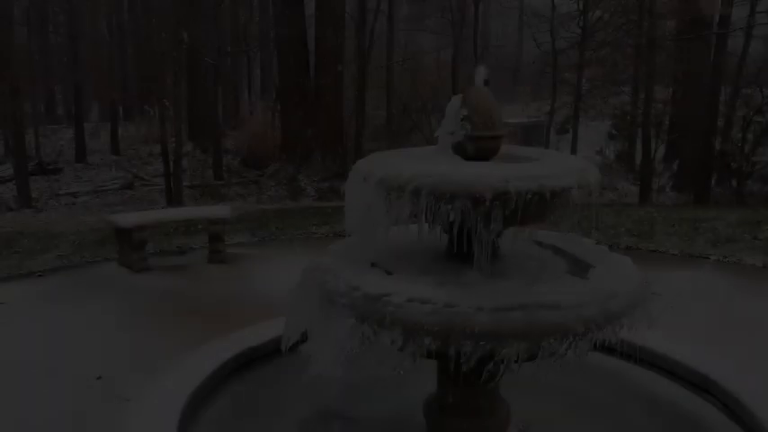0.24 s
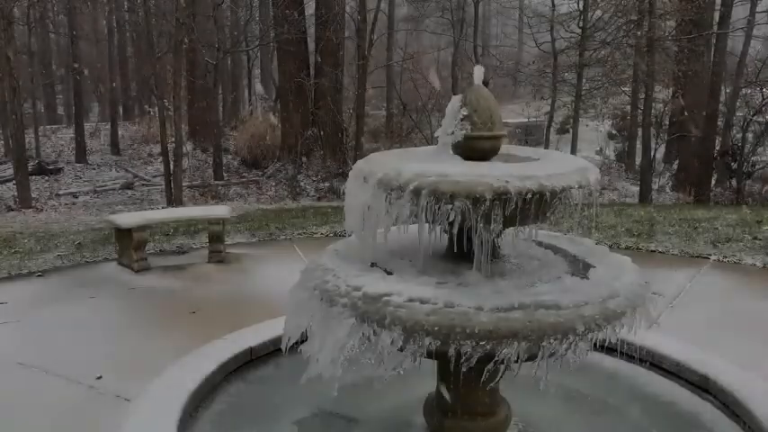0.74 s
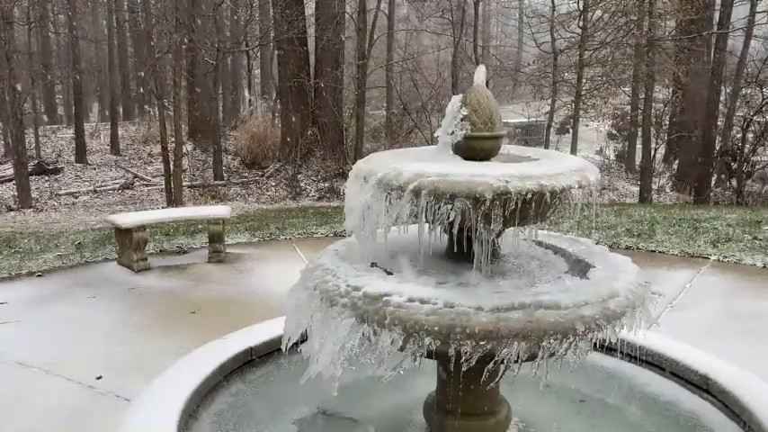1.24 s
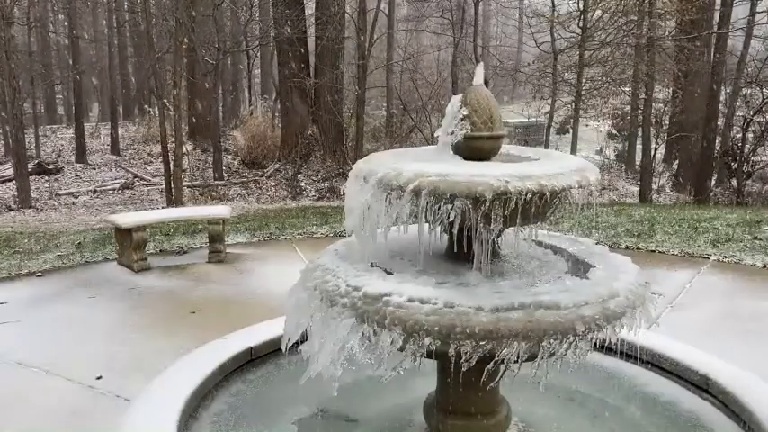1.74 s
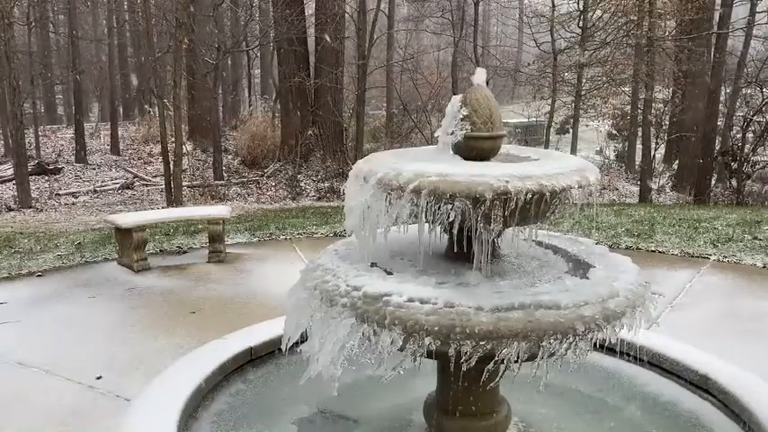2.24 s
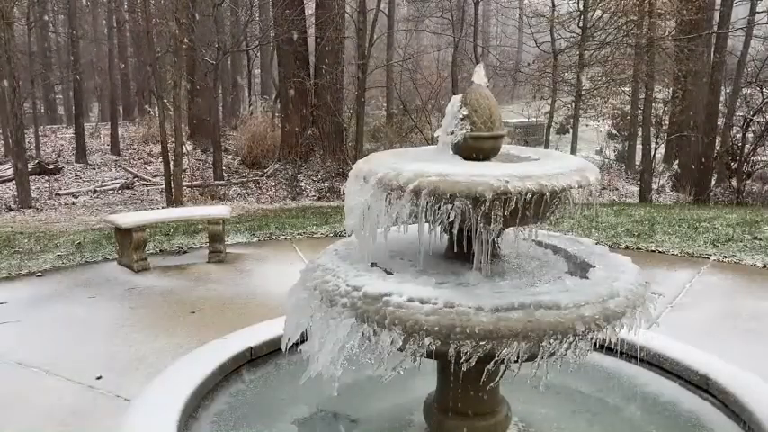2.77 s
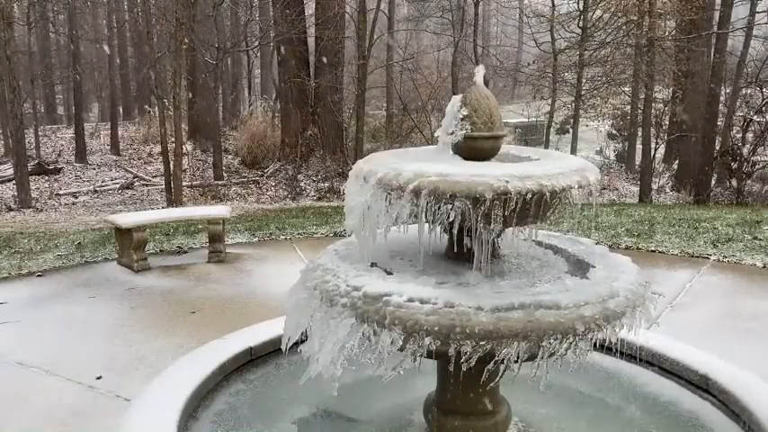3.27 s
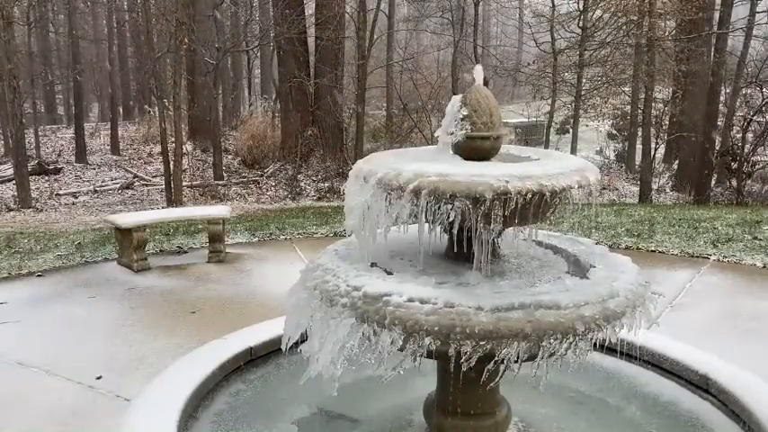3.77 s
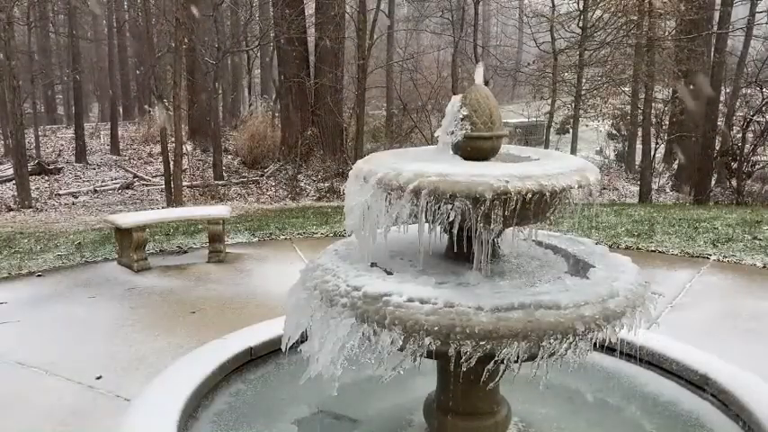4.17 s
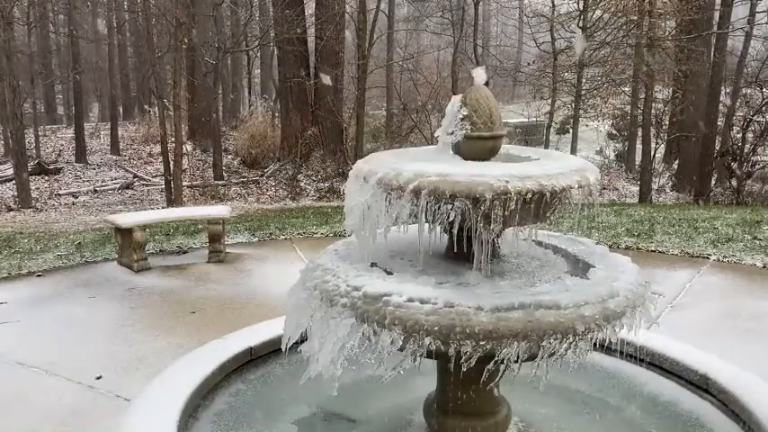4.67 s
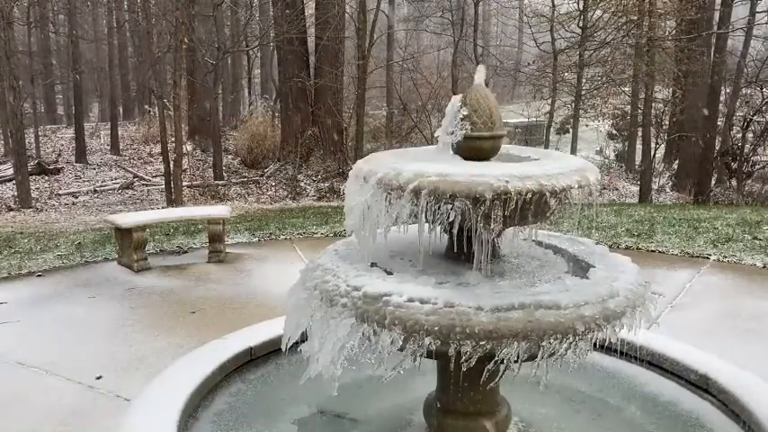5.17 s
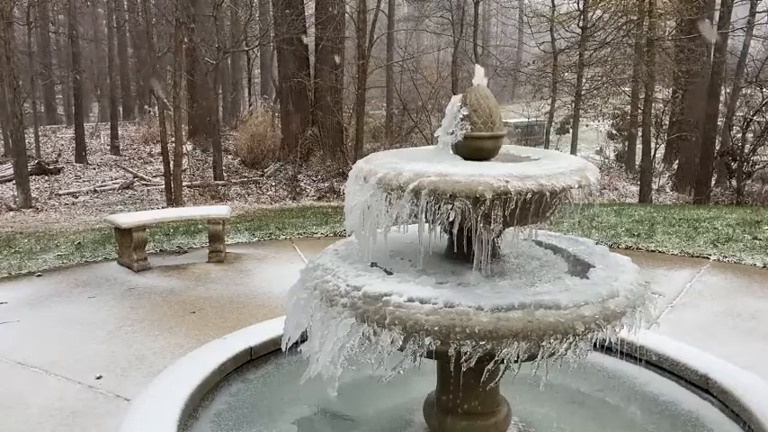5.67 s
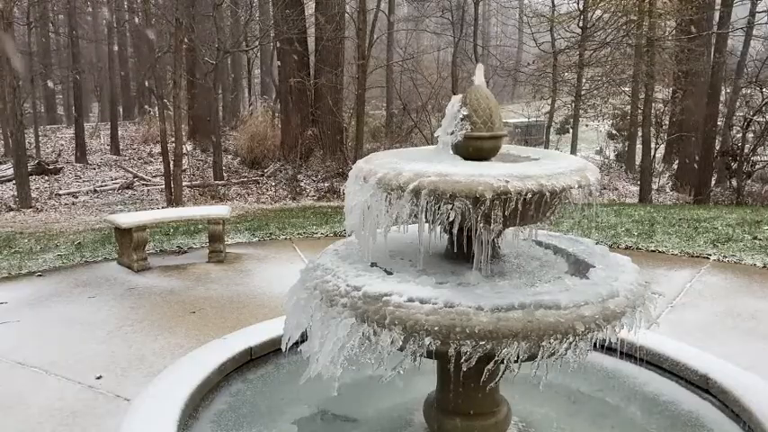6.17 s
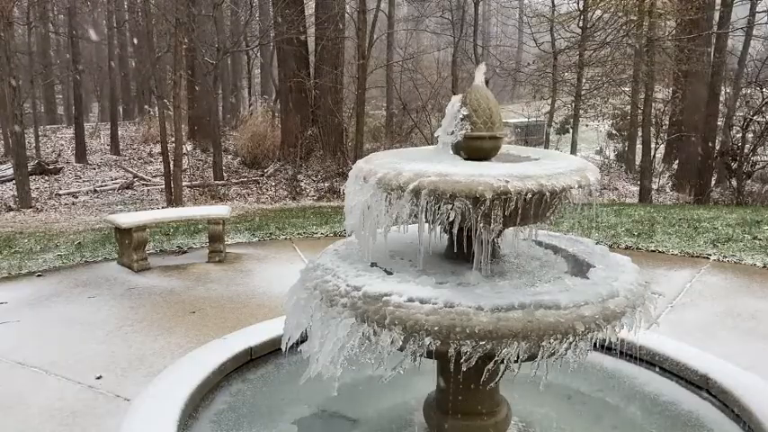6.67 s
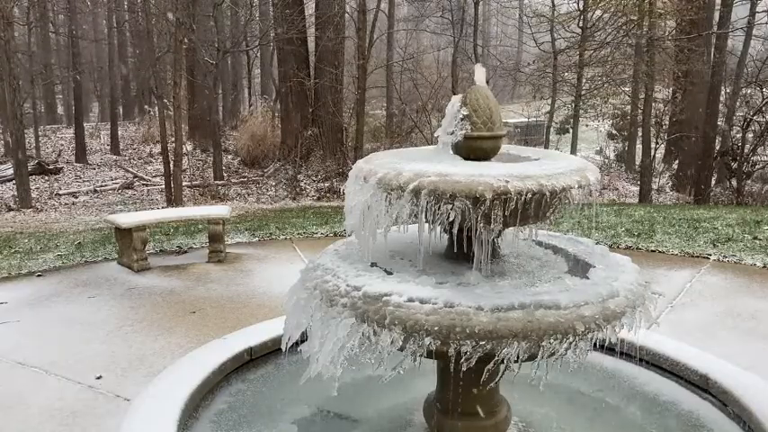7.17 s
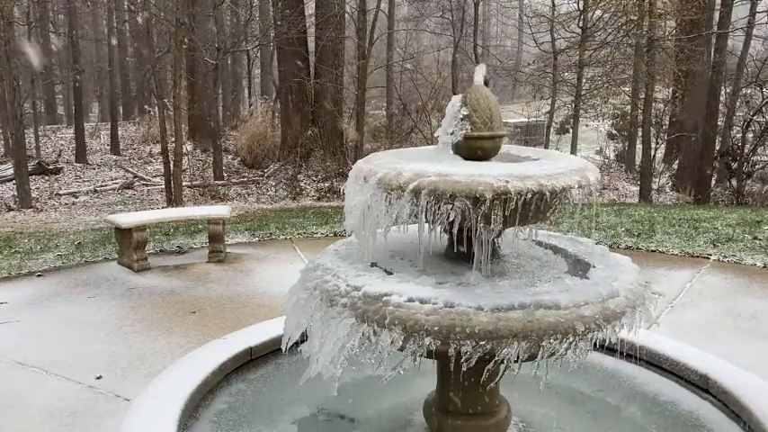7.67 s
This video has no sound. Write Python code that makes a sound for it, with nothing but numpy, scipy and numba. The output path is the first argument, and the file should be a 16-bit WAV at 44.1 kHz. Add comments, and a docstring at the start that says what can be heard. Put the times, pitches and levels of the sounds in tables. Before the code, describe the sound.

From silence, the sound fades in evenly over the first second. Thin streams of water fall from an icy tiered fountain a few steps away, slightly right of centre, and keep an almost constant level to the end near 8 s. Crisp, fine spray hiss lies over a soft mid-range gurgle. Irregular bubbles plip throughout, mostly rising in pitch, with short clumped gulps near 1.6, 2.6, 3.4 and 5.6 s. Tiny glassy pings and hard drops tick on ice, notably around 2, 4.2 and 5.1 s. The brightest, loudest plop comes at 5.4 s, a sharp slap at 6.5 s and a short plunk at 7 s. Stone bowls add a very brief dull scatter. Far traffic rumbles low beneath; a distant engine drones on a slowly climbing low note, strongest near 6.2 s, then faint rasp and soft tyre noise follow.

```python
"""Icy garden fountain with far traffic

Thin streams fall from the icy rim of a tiered fountain, a few steps from a phone and a little to its right.
Noise and short damped tones make the spray, fizz, small high bubbles and larger, mostly rising bubbles. The
stone bowls echo them as a brief, dull scatter of noise. Far traffic is low filtered noise; one engine, a slowly
climbing tone, drones for a while. The sound fades in over the first second."""
import sys
import numpy as np
from scipy import signal
from scipy.fft import rfft, irfft, next_fast_len
from scipy.io import wavfile
from numba import njit

SR = 44100
rng = np.random.default_rng(int(sys.argv[2]) if len(sys.argv) > 2 else 0)


def unload_wav(signal):
    """Save mono or channel-first audio to the path in sys.argv[1] as 16-bit WAV at rate SR, clipped to [-1, 1]."""
    wavfile.write(
        sys.argv[1],
        SR,
        np.round(np.clip(np.atleast_2d(signal).T, -1, 1) * 32767).astype(np.int16),
    )


N = 348732
TIME = np.arange(N) / SR  # s

# The fall of water. Each row: time in seconds, gurgle level in dB.
GURGLE_LEVEL = [(1, -46.5), (2.2, -47), (3.1, -46.5), (3.8, -48), (4.8, -47.5), (5.7, -46.5), (6.2, -47),
                (7.9, -47)]
# Filter for the gurgle in the basins. Each row: frequency in Hz, gain in dB.
GURGLE_SPECTRUM = [(150, -22), (300, -8), (500, -2.5), (900, -.7), (1500, 0), (2000, -2.3), (2600, -7),
                   (3500, -12), (4500, -14.5), (5300, -38), (9000, -48)]
# Filter for the sharp spray. Each row: frequency in Hz, gain in dB.
SPRAY_SPECTRUM = [(400, -14), (1500, -5), (2800, -2), (4200, -1), (7000, -1), (8500, .7), (10500, -.8),
                  (13000, -3.2), (15800, -5)]
# Filter for mist heard from all round. Each row: frequency in Hz, gain in dB.
MIST_AROUND_SPECTRUM = [(400, 34), (3000, 35.5), (4500, 26.5), (5600, -26), (15000, -6)]
# The far road. Each row: time in seconds, rumble level in dB.
ROAD_LEVEL = [(1, -45.5), (3.6, -44), (4.6, -45), (5.65, -44), (6.8, -45), (7.9, -44.5)]
# Filter for the road rumble. Each row: frequency in Hz, gain in dB.
ROAD_SPECTRUM = [(22, -19), (40, -15), (54, 2), (70, 4.5), (86, 0.5), (162, -8), (250, -12.5), (400, -19),
                 (1500, -20), (4000, -88)]
# Filter for light air at the microphones. Each row: frequency in Hz, gain in dB.
AIR_SPECTRUM = [(25, -16), (55, 0.5), (85, 2.0), (140, -31.0), (400, -14.5), (2000, -104)]
# The loudest single bubbles. Each row: start in seconds, peak level in dB, starting pitch in Hz,
# ring length in cycles of that pitch, pitch rise per ring length as a share (it levels off at 3/4).
LOUD_BUBBLES = [(0.121, -34, 1500, 9.8, .25), (0.248, -34, 2000, 17, 1.3), (0.42, -32, 4070, 17, 0.76),
                (0.713, -30, 2720, 5.9, .25), (0.87, -42, 660, 15, .4), (0.924, -35, 1430, 10, 0.21),
                (0.998, -43, 750, 10, 0.18), (1.226, -41.5, 840, 22, 0.62), (1.27, -40, 2000, 33, .15),
                (1.333, -42, 740, 16, .4), (1.607, -34, 780, 6.8, 0.28), (1.608, -31, 2880, 12, 0.32),
                (1.66, -38, 1250, 33, 0.4), (1.738, -39, 2020, 15, 0.79), (1.82, -43, 563, 13, 0.18),
                (1.9, -41, 520, 10, .3), (1.949, -37, 1180, 14, 0.46), (2.019, -40, 1900, 29, 0.44),
                (2.125, -41.5, 832, 50.5, .6), (2.269, -39, 980, 28, 0.43), (2.316, -32.5, 2020, 9.1, .25),
                (2.569, -33.5, 2570, 15, .25), (2.74, -38.5, 1220, 20, .15), (2.77, -36, 1490, 15, 1.1),
                (2.902, -35.5, 895, 15, 0.49), (2.907, -36, 1742, 33, .05), (2.998, -40, 547, 14, 0.27),
                (3.065, -31.5, 970, 6.4, 0.94), (3.126, -34.5, 1110, 15, 0.28),
                (3.139, -38, 1429, 15, 0.97), (3.215, -40.5, 1390, 29, .2), (3.402, -40.5, 524, 8.8, .2),
                (3.408, -37, 1363, 30, .05), (3.676, -40, 3100, 9, .05), (3.712, -35.5, 1850, 15, .05),
                (3.711, -35, 895, 9.4, 0.18), (4.33, -45, 573, 48, 0.27), (4.336, -38, 1190, 26, 0.27),
                (4.49, -38.5, 418, 15, 1.3), (4.526, -41, 456, 8.1, 0.18), (4.722, -39.5, 416, 13, 1.25),
                (4.85, -41, 676, 27, 0.85), (4.874, -31.5, 3580, 8.1, 0.18), (5.004, -43, 458, 29, 1),
                (5.051, -42, 611, 47, 1.5), (5.129, -39, 3950, 15, 0.56), (5.206, -35, 1205, 26, 0.64),
                (5.327, -40.5, 871, 38, .05), (5.4278, -22.5, 2390, 6.4, 0.35),
                (5.429, -22, 2890, 16, 0.97), (5.4305, -22, 4150, 24, 0.024),
                (5.434, -30.5, 3300, 23, 0.27), (5.646, -40, 480, 11, 0.24), (5.702, -37, 1450, 42, 0.064),
                (5.778, -35.5, 1061, 16, .25), (5.868, -39.5, 990, 27, 0.57), (6.428, -47, 1020, 21, 0.44),
                (6.483, -36, 1025, 12, .4), (6.538, -39, 483, 17.4, 2.04), (6.621, -28.5, 1577, 13.5, 0.05),
                (6.775, -41, 480, 6.3, 0.17), (6.822, -39, 990, 12, 0.44), (6.966, -37.5, 1220, 16, 1.9),
                (7.007, -26, 1120, 3.1, 0.05), (7.12, -40, 990, 22, .6), (7.251, -39.5, 457, 8.2, 0.17),
                (7.269, -43, 880, 29, 0.56), (7.365, -37, 1770, 18, .05), (7.521, -41, 2070, 47, .05),
                (7.617, -41, 1300, 22, .3), (7.797, -39, 890, 17, .2)]
# Further high bubbles, with a common ring length and rise. Each row: start in seconds, peak level in dB,
# starting pitch in Hz.
LOUD_HIGH_BUBBLES = [(0.987, -40, 6400), (1.3975, -33, 5730), (1.96, -28.5, 8600), (3.152, -38, 6250),
                     (3.225, -34, 5800), (3.33, -32, 6400), (3.6355, -36, 6130), (3.648, -32, 6800),
                     (3.89, -36, 5650), (3.9457, -34, 6750), (4.0935, -39, 5650), (4.1915, -28, 8150),
                     (4.491, -42, 4760), (4.6827, -41, 6550), (5.1283, -24.5, 8040), (5.501, -27, 5900),
                     (6.021, -46, 5700), (6.8285, -30.5, 9250), (7.3135, -42, 4900), (7.336, -29.5, 9150)]
# The hardest drops on ice and stone. Each row: start in seconds, relative level in dB.
LOUD_SLAPS = [(1.081, -29), (1.4056, -27.5), (2.485, -34), (2.6125, -37), (2.6334, -30.5), (2.752, -27),
              (3.223, -27), (3.439, -29), (3.699, -29), (3.714, -33), (4.0682, -30), (4.076, -31.5),
              (4.251, -37), (4.4575, -32), (4.567, -32), (5.054, -38), (5.1275, -30), (5.226, -34),
              (5.4277, -27.5), (5.501, -28.5), (5.657, -30), (6.213, -32), (6.224, -29), (6.2872, -26),
              (6.4764, -23), (6.483, -32), (7.247, -33), (7.3593, -27.5)]
# Filter for the slaps. Each row: frequency in Hz, gain in dB.
SLAP_SPECTRUM = [(1000, -30), (3000, -1), (5000, 4), (9000, 10), (15000, 4)]
# Thick gulps of water. Each row: start in seconds, peak level of the first bubbles in dB,
# middle pitch in Hz, half the length in seconds.
GULPS = [(1.605, -37.5, 1490, .018), (2.015, -38.5, 1205, 0.026), (2.568, -37.5, 1800, 0.028),
         (3.125, -38, 1750, 0.019), (3.405, -38.5, 1580, 0.036), (3.674, -39.5, 1880, 0.011),
         (4.302, -39, 1260, 0.029), (5.431, -32.5, 2590, .008), (5.64, -39.5, 1720, 0.044),
         (5.958, -39, 1920, .02), (6.075, -37.5, 2500, .022), (6.476, -38, 4330, .005),
         (7.235, -41.5, 1460, 0.026), (7.622, -36, 1580, .018)]
# Filter for the passing tyres. Each row: frequency in Hz, gain in dB.
TYRE_SPECTRUM = [(110, -30), (170, -3), (205, 0), (240, -7), (300, -14), (410, -5), (600, -22), (2000, -90)]

PORT_LAG_S = 8.05e-5  # from the fountain, sound reaches the left port this much after the right
SPRAY_SPREAD = .04  # scatter of that lag in the spray, as a share
SURGE_DB, SURGES_PER_S = 0.2, 14  # small surges of the streams
SWELL_DB, SWELLS_PER_S = 0.73, 9  # swells of the road
SPRAY_DB, SLAP_GAIN_DB, ECHO_DB = -45.8, -3.5, -15  # the echo gain is before its treble is dulled
HIGH_BUBBLE_CYCLES, HIGH_BUBBLE_RISE = 13, .1  # ring length; rise per ring length as a share
ENGINE_HZ, ENGINE_DB = 131.6, -48.5  # mean firing rate and level when nearest
NEAREST_S, PASSING_S = 6.15, 0.67  # moment it is nearest; time from there to fall 3 dB
CLIMB_HZ_PER_S = 2.6
ASTERN_S, ASTERN_WIDTH_S = 6.65, .5  # moment the rasp is loudest; time from there to fall 3 dB
TOP_HZ = 15720  # steep upper limit of the sound


def undb(db):
    """Decibels to gain."""
    return 10 ** (np.asarray(db) / 20)


def unit(x):
    """Scale to rms 1."""
    return x / np.sqrt(np.mean(x ** 2))


def colour(x, spectrum):
    """Filter by a (Hz, dB) spectrum; the result has rms 1."""
    size = next_fast_len(N)
    hz, db = np.transpose(spectrum)
    bin_hz = np.maximum(np.arange(size // 2 + 1) * SR / size, 1)
    gain = undb(np.interp(np.log(bin_hz), np.log(hz), db))
    return unit(irfft(rfft(x, size) * gain, size)[..., :N])


def walk(rate):
    """Slow chance: random values, so many a second, joined by straight lines; spread near 1."""
    return 1.2 * np.interp(TIME * rate, np.arange(1000), rng.standard_normal(1000))


@njit
def rings(start, size, hz, cycles, rise, lag):
    """Damped tones that swell quickly and glide up until they level off; each reaches the left port a lag later."""
    out = np.zeros((2, N))
    for k in range(len(start)):
        life = cycles[k] / hz[k]
        for port in range(2):
            born = start[k] + lag[k] * (1 - port)
            first = max(int(born * SR) + 1, 0)
            last = min(int((born + 1.6 * life) * SR), N)
            for i in range(first, last):
                age = (i / SR - born) / life
                swell = 2.6 * (np.exp(-3.5 * age) - np.exp(-11 * age))  # peaks near 1
                climb = age * age / 2 if age < .75 else .75 * (age - .375)
                phase = 2 * np.pi * cycles[k] * (age + rise[k] * climb)
                out[port, i] += size[k] * swell * np.sin(phase)
    return out


def shower(splashes, low_hz, high_hz, cycles, rise, scatter_db, after_s, spread, count):
    """Bubbles born just after splashes: random in pitch, ring and direction, a few much louder than the rest."""
    pick, pitch, wait, loud, ring, glide, place, sign = rng.random((count, 8)).T
    when, strength = splashes[(pick * len(splashes)).astype(int)].T
    start = when - after_s * np.log(1 - wait)
    hz = low_hz * (high_hz / low_hz) ** pitch
    big = np.minimum(-np.log(1 - loud), 4)
    # small bubbles die sooner, so they must be stronger to carry the same power per Hz
    size = strength * undb(scatter_db * big) * hz / high_hz * np.sign(sign - .5)
    ring_cycles = cycles * 2 ** (2 * ring - 1)
    lag = PORT_LAG_S * (1 + spread * (2 * place - 1))
    return rings(start, size, hz, ring_cycles, 2 * rise * glide, lag)


def wash(diffuse_db=-1):
    """The churning water's blurred murmur: noise partly from the fountain and partly from all round."""
    return unit(rng.standard_normal(N) + undb(diffuse_db) * rng.standard_normal((2, N)))


def mist(diffuse_db=-7):
    """Countless tiny droplets merge into an even hiss: most straight from the fountain, some from all round."""
    hiss = rfft(rng.standard_normal(N))
    late = np.exp(-2j * np.pi * np.arange(len(hiss)) * SR / N * PORT_LAG_S)
    around = colour(rng.standard_normal((2, N)), MIST_AROUND_SPECTRUM)
    return unit(irfft([hiss * late, hiss], N)) + undb(diffuse_db) * around


def puffs(splashes, decay_s=0.012, steady=0.22):
    """Loudness of the mist: each splash throws up a puff whose power starts at once and dies away."""
    when, strength = splashes.T
    power = np.bincount((when * SR).astype(int), strength ** 2, N)[:N]
    power = signal.lfilter([1], [1, -np.exp(-1 / (decay_s * SR))], power)
    return unit(np.sqrt(power / power.mean() + steady))


def falling_water(uneven_db=1.0, mist_db=8.0, spatter_db=-4, glug_db=-4, wash_db=-10.0, count=2000):
    """The streams break into splashes of uneven strength; these feed gurgle, fizz, spatter and mist."""
    when = rng.random(count) * N / SR
    strength = undb(uneven_db * np.clip(rng.standard_normal(count), -2, 2))
    splashes = np.column_stack([when, strength])
    plash = shower(splashes, 260.2, 3970, cycles=8.5, rise=0.4, scatter_db=1.0,
                   after_s=.012, spread=1.34, count=10000)
    # bubbles that climb to the surface ring longer and sweep up in pitch
    glugs = shower(splashes, 379.3, 2123, cycles=15.4, rise=0.225, scatter_db=1.1,
                   after_s=.02, spread=0.82, count=900)
    fizz = shower(splashes, 2000, 15000, cycles=14, rise=.1, scatter_db=3.2,
                  after_s=.008, spread=SPRAY_SPREAD, count=20000)
    spatter = shower(splashes, 5500, 16000, cycles=2.6, rise=.3, scatter_db=3.5,
                     after_s=.002, spread=SPRAY_SPREAD, count=12000)
    gurgle = colour(unit(plash) + undb(glug_db) * unit(glugs), GURGLE_SPECTRUM)
    gurgle = gurgle + undb(wash_db) * colour(wash(), GURGLE_SPECTRUM)
    droplets = unit(fizz) + undb(spatter_db) * unit(spatter)
    spray = colour(droplets + undb(mist_db) * mist() * puffs(splashes), SPRAY_SPECTRUM)
    gurgle_db = np.interp(TIME, *np.transpose(GURGLE_LEVEL)) + SURGE_DB * walk(SURGES_PER_S)
    return gurgle * undb(gurgle_db) + spray * undb(SPRAY_DB)


def basins(x, decay_s=0.0065, build_s=0.0086, dull_hz=3800):
    """Bowls, rim and paving send back a faint, short, duller scatter from all sides."""
    t = np.arange(SR // 4) / SR
    envelope = np.exp(-t / decay_s) * (1 - np.exp(-t / build_s))
    scatter = rng.standard_normal((2, len(t))) * envelope
    scatter = scatter / np.linalg.norm(scatter[0])
    scatter = signal.sosfilt(signal.butter(2, dull_hz, fs=SR, output="sos"), scatter)
    return x + undb(ECHO_DB) * signal.fftconvolve(x, scatter, axes=1)[:, :N]


def traffic(air_db=-7):
    """A far road rumbles alike in both ports, with quick swells; light air stirs each port on its own."""
    road = colour(rng.standard_normal(N), ROAD_SPECTRUM)
    air = colour(rng.standard_normal((2, N)), AIR_SPECTRUM)
    level_db = np.interp(TIME, *np.transpose(ROAD_LEVEL)) + SWELL_DB * walk(SWELLS_PER_S)
    return (road + undb(air_db) * air) * undb(level_db)


def bubbles(rows):
    """Single trapped bubbles, each a damped tone; rows as in LOUD_BUBBLES."""
    s, db, hz, cycles, rise = np.array(rows, float).T.copy()
    return rings(s, undb(db), hz, cycles, rise, np.full(len(s), PORT_LAG_S))


def stray_bubbles(peak_db=-44.5, scatter_db=2, centre_hz=1250, octaves=0.75, cycles=15, rise=0.344, count=64):
    """Fat drops trap lone bubbles all the time, of any size and most of them rising; rows as in LOUD_BUBBLES."""
    when, loud, small, large, ring, glide = rng.uniform(-1, 1, (count, 6)).T
    s = (np.arange(count) + .5 + when) / count * N / SR
    hz = centre_hz * 2 ** (octaves * (small + large))
    return np.column_stack([s, peak_db + scatter_db * loud, hz, cycles * 2 ** ring, rise * (1 + glide)])


def high_bubbles(rows):
    """Small high bubbles ring for a couple of milliseconds, barely rising in pitch; rows as in
    LOUD_HIGH_BUBBLES."""
    return bubbles([(s, db, hz, HIGH_BUBBLE_CYCLES, HIGH_BUBBLE_RISE) for s, db, hz in rows])


def stray_high_bubbles(peak_db=-40.5, scatter_db=3.5, low_hz=3800, high_hz=10500, count=170):
    """Fainter high bubbles ring all the time, half buried in the spray; rows as in LOUD_HIGH_BUBBLES."""
    when, loud, pitch = rng.random((count, 3)).T
    db = peak_db + scatter_db * (2 * loud - 1)
    return np.column_stack([when * N / SR, db, low_hz * (high_hz / low_hz) ** pitch])


def slaps(rows, crack_s=0.0009, patter_s=0.005):
    """A drop hits a hard surface with a broad crack, then its droplets patter down for a few milliseconds."""
    s, db = np.transpose(rows)
    hits = np.bincount((s * SR).astype(int), undb(db + SLAP_GAIN_DB), N)[:N]
    t = np.arange(SR // 20) / SR
    fading = np.exp(-t / crack_s) + .3 * np.exp(-t / patter_s)
    return colour(mist(), SLAP_SPECTRUM) * signal.fftconvolve(hits, fading)[:N]


def stray_slaps(peak_db=-37, scatter_db=4, count=18):
    """Lighter drops land on the ice at any moment; rows as in LOUD_SLAPS."""
    when, loud = rng.random((count, 2)).T
    return np.column_stack([when * N / SR, peak_db + scatter_db * (2 * loud - 1)])


def gulp_bubbles(rows, octaves=0.664, fall_db=5, cycles=8, rise=0.53, count=12):
    """A gulp of water breaks into a clump of bubbles, the late ones weaker; rows out as in LOUD_BUBBLES."""
    s, db, middle_hz, half_length = np.repeat(rows, count, axis=0).T
    when, small, large, ring, glide = rng.random((len(s), 5)).T
    late = (np.arange(len(s)) % count + when) / count
    start = s + half_length * late * (1 + late)  # they thin out towards the end
    hz = middle_hz * 2 ** (2 * octaves * (small - large))
    return np.column_stack([start, db - fall_db * late, hz, cycles * 2 ** (2 * ring - 1), 2 * rise * glide])


def engine(waver=0.00198, throb_db=0.6, wavers_per_s=6, third_db=-62.5, tyres_db=-56, tyres_s=0.37):
    """A distant exhaust drones on one slowly climbing note, loudest when nearest; rasp and tyres follow."""
    hz = (ENGINE_HZ + CLIMB_HZ_PER_S * (TIME - NEAREST_S)) * (1 + waver * walk(wavers_per_s))
    phase = 2 * np.pi * np.cumsum(hz) / SR
    nearness = 1 / np.hypot(1, ((TIME - NEAREST_S) / PASSING_S) ** 2)
    astern = 1 / np.hypot(1, ((TIME - ASTERN_S) / ASTERN_WIDTH_S) ** 2)
    drone = unit(np.sin(phase)) * nearness * undb(ENGINE_DB + throb_db * walk(wavers_per_s))
    rasp = unit(np.sin(3 * phase)) * astern * undb(third_db)  # third harmonic
    # the tyres come up until ASTERN_S and then stay
    tyres_in = np.clip((TIME - ASTERN_S) / tyres_s + 1, 0, 1)
    tyres = colour(rng.standard_normal(N), TYRE_SPECTRUM) * tyres_in * undb(tyres_db)
    return drone + rasp + tyres


def scene():
    """The fountain stands a few steps off, a little to the right; the road is far off."""
    plips = bubbles(np.vstack([LOUD_BUBBLES, gulp_bubbles(GULPS), stray_bubbles()]))
    high_plips = high_bubbles(np.vstack([LOUD_HIGH_BUBBLES, stray_high_bubbles()]))
    hits = slaps(np.vstack([LOUD_SLAPS, stray_slaps()]))
    fountain = basins(falling_water() + plips + high_plips + hits)
    port_gain = undb([[-.7], [.6]])  # left, right
    return fountain + (traffic() + engine()) * port_gain


def record(dry):
    """A straight fade-in and a steep cut of the top."""
    fade = np.clip((TIME - .04) / .98, 0, 1)
    top_cut = signal.ellip(10, .05, 60, TOP_HZ, fs=SR, output="sos")
    return signal.sosfiltfilt(top_cut, dry * fade)


dry = scene()
out = record(dry)
unload_wav(out)
```